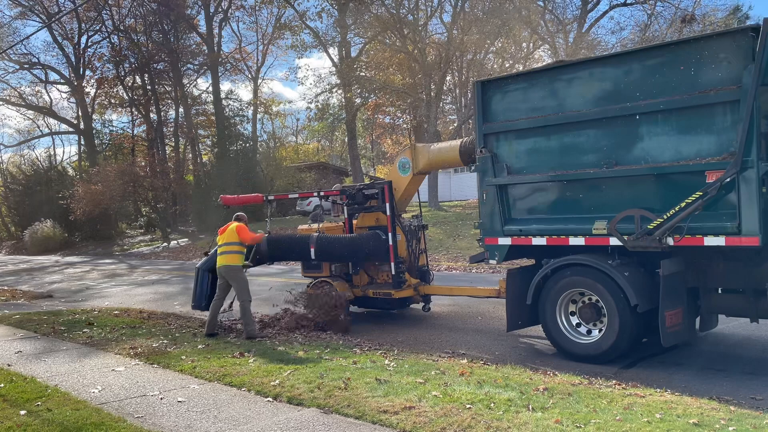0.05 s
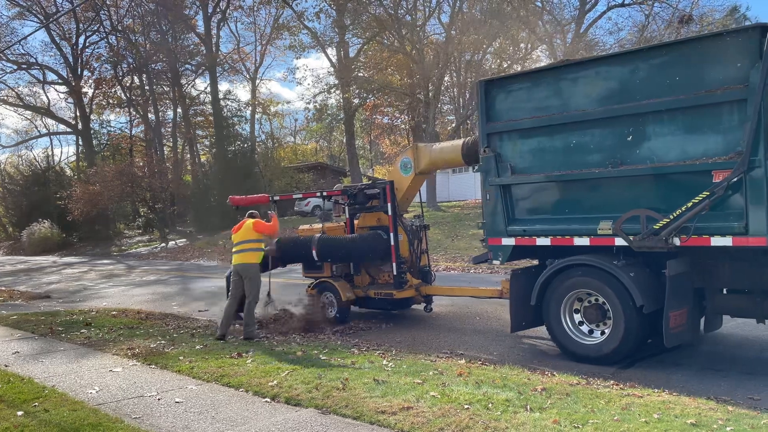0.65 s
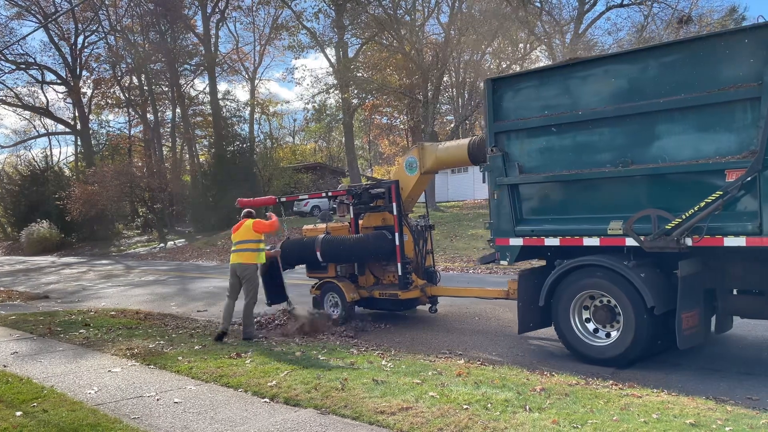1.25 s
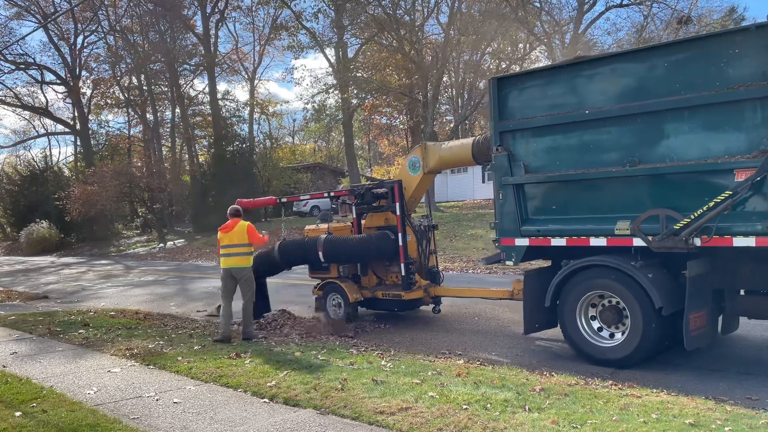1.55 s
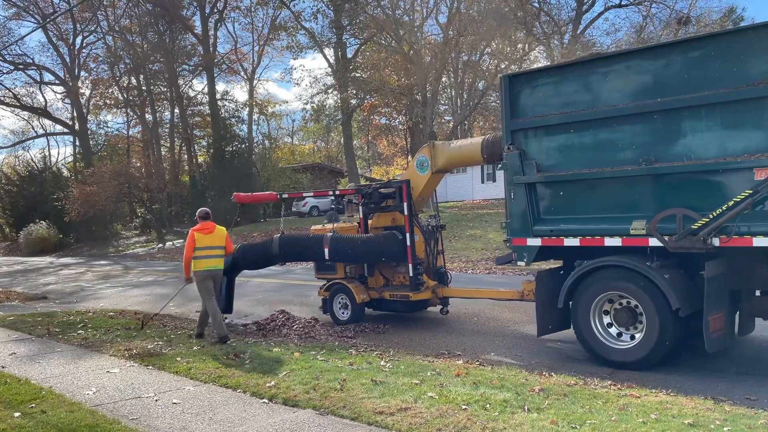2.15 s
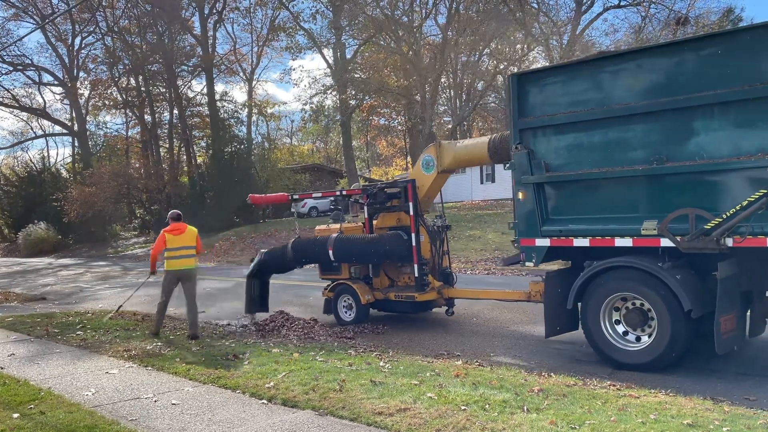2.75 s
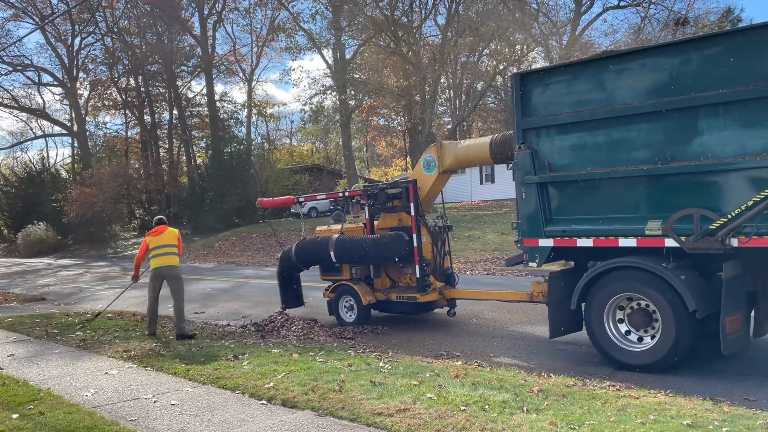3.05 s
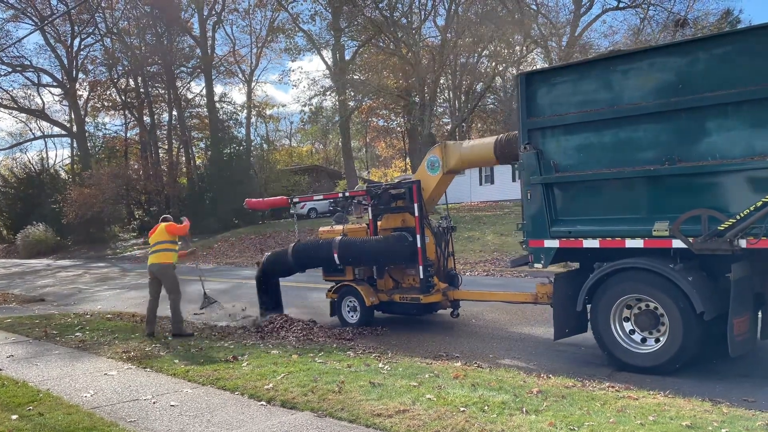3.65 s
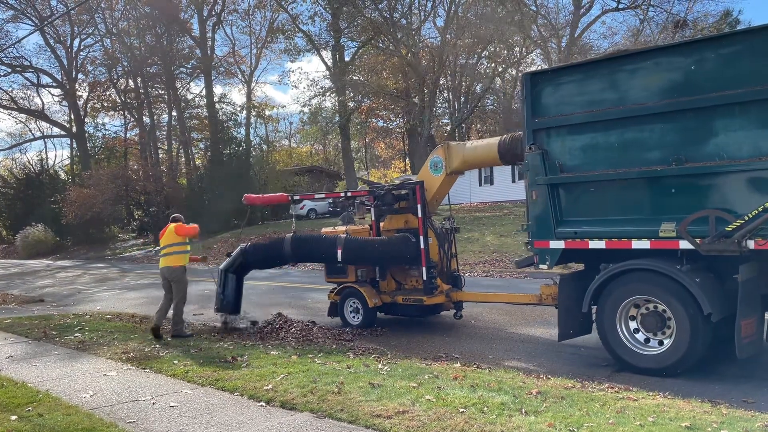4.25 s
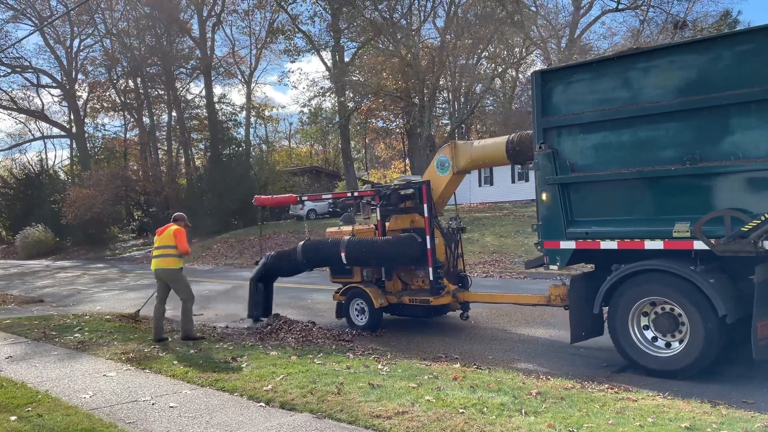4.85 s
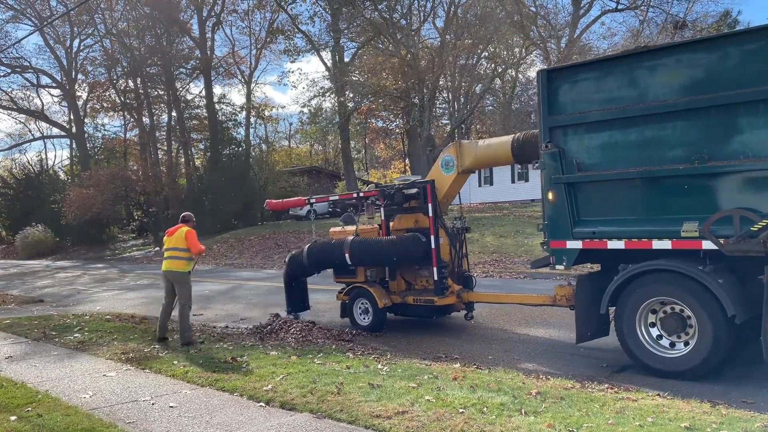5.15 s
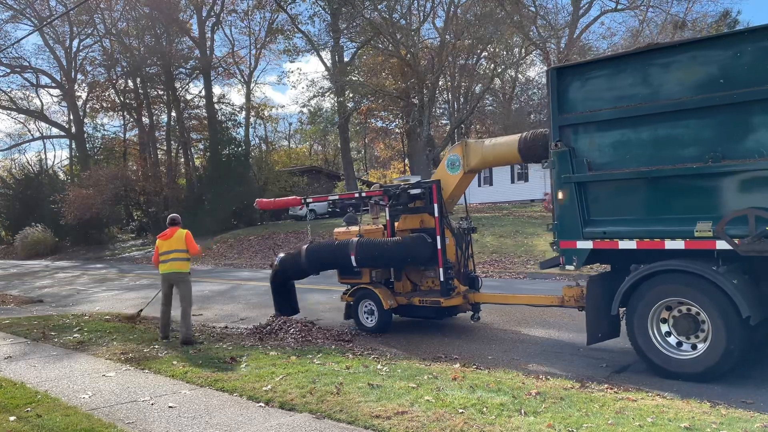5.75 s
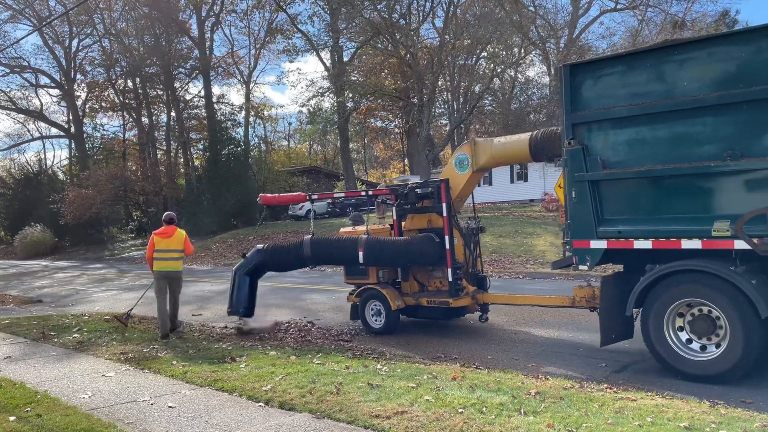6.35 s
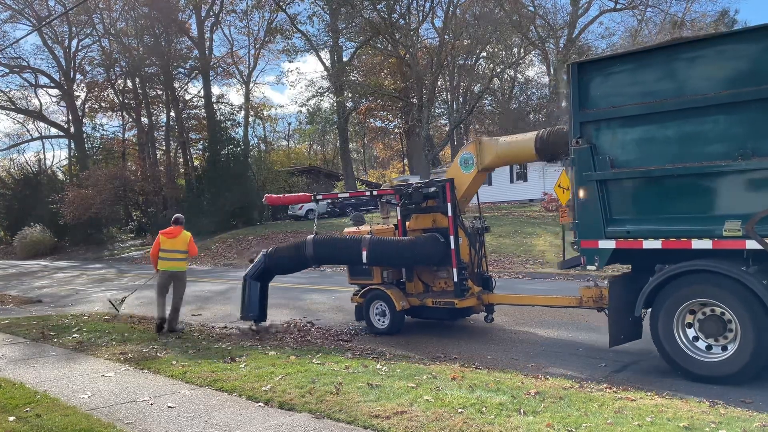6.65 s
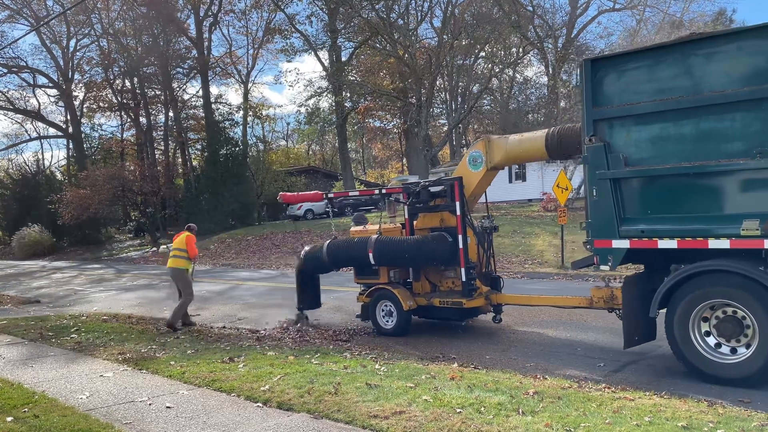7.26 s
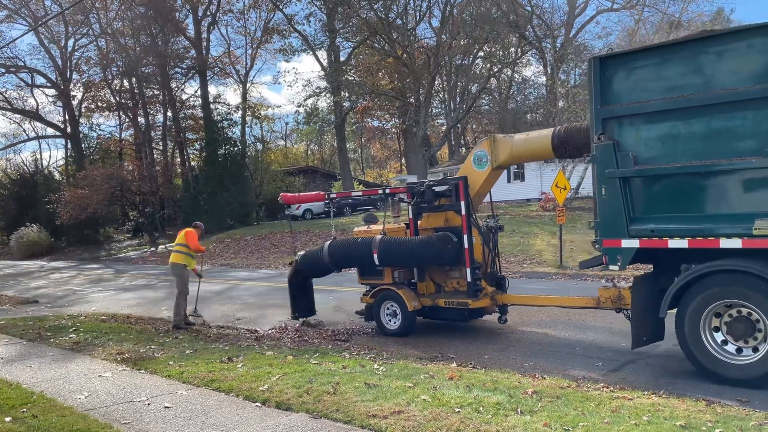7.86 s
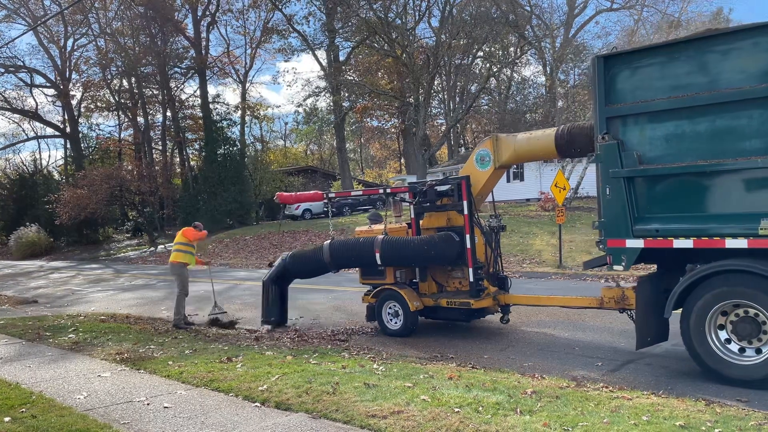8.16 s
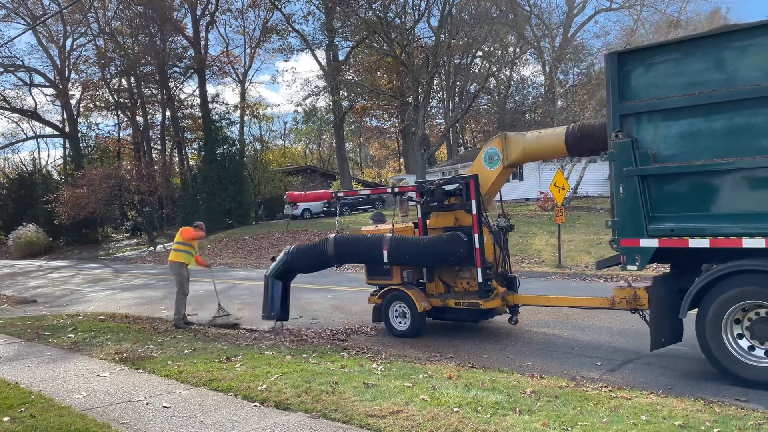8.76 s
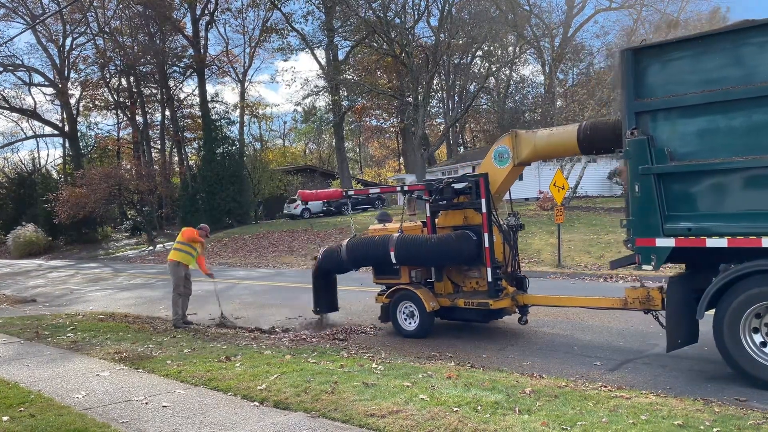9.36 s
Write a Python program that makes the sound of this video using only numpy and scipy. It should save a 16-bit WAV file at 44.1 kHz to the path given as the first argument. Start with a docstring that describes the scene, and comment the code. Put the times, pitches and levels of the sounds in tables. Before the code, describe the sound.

Outdoors by a kerb, a leaf vacuum a few metres away makes a continuous low drone, hum and suction roar. Surges of leaves hiss through it, with scattered twig knocks at first and hollow booms from the hose. Later a burst of loud knocks drags the engine and fan a little lower, and a hoarse whistle rises. High, thin squeals from a slow truck's brakes come and go throughout.

```python
"""A towed leaf vacuum works along a kerb, a few metres away, behind a slowly creeping truck.
From the start its engine drones, its belt-driven impeller hums and air roars in the hose, while leaves
hiss and rattle up the steel chute and dragging brakes squeal on and off. Wads and twigs knock on the
housing in the first 2.5 s; near 4 s the hose booms hollowly. Just after 6 s the heaviest wad goes
through: engine and impeller sag, sag again near 7.5 s, and the hose mouth whistles hoarsely."""
import sys
import numpy as np
from scipy import signal
from scipy.fft import rfft, irfft
from scipy.io import wavfile
from scipy.ndimage import uniform_filter1d, minimum_filter1d

SR = 44100
rng = np.random.default_rng(int(sys.argv[2]) if len(sys.argv) > 2 else 0)


def materialize(psi):
    """Save the field psi as 16-bit PCM at rate SR to the path in sys.argv[1].

    A 1-D psi becomes a single channel; in a 2-D psi each row is a channel.
    """
    bounded = np.clip(np.atleast_2d(psi).T, -1, 1)
    quanta = np.round(bounded * 32767).astype(np.int16)
    wavfile.write(sys.argv[1], SR, quanta)


N = 419391
T = np.arange(N) / SR
HZ = np.fft.rfftfreq(N, 1 / SR)

# The impeller's speed and hum. Each row: time in seconds, blade-passing frequency in Hz, level in dB.
IMPELLER_RUN = [(0.0, 233.2, -18.4), (0.47, 231.5, -12.3), (0.65, 234.6, -16.3), (1.6, 233.6, -15.5),
                (1.8, 236.0, -20.4), (2.05, 234.7, -15.9), (2.2, 233.0, -18.1), (2.6, 233.4, -13.6),
                (3.95, 235.7, -13.8), (4.35, 234.4, -16.3), (4.6, 233.6, -15.6), (5.15, 235.0, -13.1),
                (5.85, 234.3, -13.3), (6.15, 236.2, -17.7), (6.4, 228.4, -16.9), (6.98, 229.6, -17),
                (7.11, 231.6, -25), (7.22, 230, -19.5), (7.4, 226.5, -21), (7.55, 224.3, -18.2),
                (8.25, 229.2, -17), (8.65, 225.8, -18.2), (9.5, 229.9, -16.8)]
# Wads and twigs that hit the impeller. Each row: start in seconds, spray level in dB,
# time for the spray to fall 60 dB in seconds, hardness from 0 to 1, knock level in dB.
WAD_STRIKES = [(.033, -19.5, 0.18, 0, -23), (0.074, -24, .06, .1, -21), (.826, -25, .08, .8, -30),
               (1.060, -21, .09, 0.2, -20), (1.089, -20, .05, .7, -25), (1.108, -25, .06, .8, -26),
               (1.138, -21, .05, .8, -28), (1.157, -23, .05, 0.5, -24), (1.995, -20, .17, 0.8, -27),
               (2.055, -19, 0.063, 0.5, -20), (2.130, -20, .15, 0.6, -26), (2.149, -24, .07, .6, -25),
               (2.240, -18, .11, .5, -23), (2.455, -29, .06, .4, -23), (6.110, -29, .04, .2, -25),
               (6.145, -19, .1, .25, -10), (6.172, -20, 0.046, .95, -28), (6.218, -20, .07, .1, -17),
               (6.240, -21, .07, .1, -17), (6.281, -12.5, .1, .25, -6), (6.297, -16, 0.071, 0, -13),
               (6.331, -22, .12, 0, -20), (6.370, -20, 0.2, .1, -13), (6.399, -27, .14, 0, -13.5),
               (6.428, -30, .25, 0, -19), (7.398, -21, .14, 0.3, -21), (7.423, -26, .09, .5, -17),
               (7.479, -19, .1, .2, -19), (7.532, -23, 0.18, .2, -22), (7.612, -19, .059, .1, -20),
               (8.509, -25, .05, .5, -24)]


def engine():
    """Periodic firing radiates a harmonic exhaust note and amplitude-modulates a low mechanical roar."""
    # Each row: time in seconds, firing frequency in Hz, level in dB.
    engine_run = [(0.0, 80.9, -15.0), (0.45, 82.5, -14.1), (0.85, 80.3, -14.3), (1.05, 81.8, -14.2),
                  (1.2, 80.1, -14.8), (1.65, 80.7, -14.3), (2.55, 79.9, -14.8), (3.9, 80.7, -13.6),
                  (5.95, 80.0, -14.4), (6.3, 81.7, -13.5), (6.65, 78.0, -15.7), (7.35, 80.1, -14.7),
                  (7.6, 77.4, -15.3), (9.5, 78.6, -15.2)]
    # Each row: multiple of the firing rate, relative level in dB. Unequal cylinders give half orders.
    orders = [(1, 0), (1.5, -27), (3, -17), (3.5, -40), (5.5, -37), (6, -29.5), (6.5, -43), (7, -30.5)]
    # Brief dips of the note. Each row: start in seconds, length in seconds, level change in dB.
    dips = [(.07, 0.093, -1.5), (1.08, 0.098, -7), (1.184, 0.06, -3), (1.37, 0.11, -5), (2.09, 0.066, -7),
            (7.144, 0.088, -5), (8.45, .09, -4)]
    # Overtones that vary on their own. Each row: multiple of the firing rate, resting level in dB.
    overtones = [(2, -28.5), (5, -37.5)]
    # Their swells. Each row: start in seconds, length in seconds, multiple, level in dB.
    swells = [(.15, .7, 5, -31), (.4, .7, 2, -24), (1.1, 2.3, 2, -23), (4.3, 1, 2, -28), (5.1, 1.1, 5, -34),
              (7.5, .8, 2, -22.5), (8.5, 1.2, 2, -25.5)]
    # The roar's spectrum. Each row: frequency in Hz, relative level in dB.
    roar_spectrum = [(50, -27), (95, 0.5), (125, 0.5), (160, -1), (200, 3), (260, -1.5), (355, -4),
                     (425, -15.5), (475, -9), (560, -21.5), (1200, -66)]
    firing_hz, db = curves(engine_run)
    cycles = np.cumsum(firing_hz) / SR
    dips_db = sum(change_db * arch(start, length, peak=0.71) for start, length, change_db in dips)
    exhaust = amp(db + dips_db) * drone(cycles, orders, flutter=0.061, flutter_hz=22, sway_rad=0.029)
    for multiple, rest_db in overtones:
        level = overtone_envelope(multiple, rest_db, swells, waver_db=0.5, waver_hz=0.41)
        exhaust += level * drone(cycles, [(multiple, 0)], flutter=0.25, flutter_hz=12, sway_rad=0.04)
    throb = 1 + 0.19 * np.cos(2 * np.pi * cycles)
    roar = amp(-20.5) * stereo_noise(turbulence() * throb, roar_spectrum)
    return roar + exhaust * pan(left_db=-0.5)


def impeller():
    """Blades chop the air into a blade-passing tone; uneven inflow modulates it and its overtones."""
    # Harmonics that follow the hum's level. Each row: multiple of the blade rate, relative level in dB.
    orders = [(1, 0), (5, -33)]
    # Overtones that vary on their own. Each row: multiple of the blade rate, resting level in dB.
    overtones = [(2, -44.5), (3, -48.5), (4, -50.5), (5, -46.5)]
    # Their swells. Each row: start in seconds, length in seconds, multiple, level in dB.
    swells = [(0, .14, 2, -30), (.15, 1.3, 4, -40.5), (1.85, .35, 4, -37), (2.25, .37, 2, -34),
              (3.55, 1.5, 3, -36), (3.85, .7, 2, -32), (5.15, .5, 3, -38), (5.83, .42, 3, -32.5),
              (6.62, .6, 2, -33.5), (7.6, 1.2, 2, -33), (8.58, .4, 3, -35), (8.6, 1.1, 2, -34)]
    blade_hz, db = curves(IMPELLER_RUN)
    cycles = np.cumsum(blade_hz) / SR
    hum = amp(db) * drone(cycles, orders, flutter=0.046, flutter_hz=20, sway_rad=0.061)
    for multiple, rest_db in overtones:
        level = overtone_envelope(multiple, rest_db, swells, waver_db=2.5, waver_hz=2.3)
        hum += level * drone(cycles, [(multiple, 0)], flutter=0.5, flutter_hz=17, sway_rad=0.25)
    return hum * pan(left_db=0.8)


def sag_hz(full_speed_hz=234):
    """Load slows the impeller: the drop of its blade-passing frequency below full speed."""
    blade_hz, _ = curves(IMPELLER_RUN)
    return np.maximum(full_speed_hz - blade_hz, 0)


def suction(full_speed_db=-25.5, loss_db_per_hz=0.15):
    """Turbulent flow makes a broadband roar that weakens as the impeller slows, over low buffeting."""
    # Spectra of the roar and the buffeting. Each row: frequency in Hz, relative level in dB.
    air_spectrum = [(150, -4), (450, -3), (620, 3), (740, 6), (1000, -1.5), (1200, 0.5), (1650, -2.5),
                    (1780, -3), (1860, -4), (2030, -8), (2320, -3), (2650, -9.5), (2820, -7), (3000, -8),
                    (3400, -7.5), (4350, -12.5), (5000, -14), (7000, -24.5), (16000, -37)]
    buffet_spectrum = [(10, -40), (28, -27), (55, 2), (85, -1), (120, -5), (220, -7.5), (600, -57)]
    # Stronger puffs of buffeting. Each row: start in seconds, length in seconds, level in dB.
    puffs = [(0, 0.31, -19), (.74, 0.46, -24), (1.25, 0.24, -16), (2.055, 0.23, -16), (5.552, 0.32, -25),
             (7.1, 0.26, -23), (8.05, 0.43, -29)]
    air_level = amp(full_speed_db - loss_db_per_hz * sag_hz() + 0.5 * wander(25))
    air = air_level * stereo_noise(turbulence(), air_spectrum)
    puff_level = sum(amp(db) * arch(start, length, peak=0.25) for start, length, db in puffs)
    buffet_level = np.hypot(amp(-26 - 0.3 * wander(2.5)), puff_level)
    return air + buffet_level * stereo_noise(turbulence(), buffet_spectrum)


def intake(attack_s=0.017, release_s=0.073, loss_db_per_hz=0.5):
    """Incoherent sources add in power: a trickle plus gulps gives the leaf and debris amplitudes."""
    # Gulps up the hose. Each row: start in seconds, length in seconds, leaf hiss in dB, debris in dB.
    gulps = [(0.0, 0.055, -32.5, -24), (0.262, 0.13, -35.5, -36), (.45, 0.22, -43, -40),
             (0.79, 0.39, -35, -34), (1.793, 0.46, -34.5, -34), (2.33, 0.12, -35.5, -25.5),
             (2.5, 0.21, -40, -42), (2.6, 0.57, -60, -35), (3.9, 0.75, -36, -32.5), (4.15, 0.25, -38, -30),
             (4.774, 0.63, -36.5, -33.5), (5.47, 0.1, -31, -33), (5.94, 0.55, -34.5, -25),
             (6.066, 0.24, -29.5, -35), (6.45, 0.43, -37.5, -49), (6.87, 0.75, -34, -26.5),
             (7.938, 0.23, -35, -33), (8.163, 0.5, -30.5, -26.5), (8.65, 0.77, -38, -33),
             (9.2, 0.36, -33.5, -29.5)]
    leaf_power = np.full(N, amp(-40) ** 2)
    debris_power = amp(-33.5 - loss_db_per_hz * sag_hz()) ** 2
    for start, length, hiss_db, debris_db in gulps:
        age = np.maximum(T - start, 0)
        # Light leaves rush in at once and trail off; heavy debris lifts later.
        rush = (1 - np.exp(-age / attack_s)) * np.exp(-np.maximum(age - length, 0) / release_s)
        leaf_power += (amp(hiss_db) * rush) ** 2
        debris_power += (amp(debris_db) * arch(start, length, peak=0.82)) ** 2
    return np.sqrt(leaf_power), np.sqrt(debris_power)


def leaves(level):
    """Thousands of dry shreds a second scour the hose and chute; their impacts merge into a hiss."""
    # Each row: frequency in Hz, relative level in dB.
    hiss_spectrum = [(600, -36), (2500, 4), (4000, -0.5), (5200, 3.5), (6500, 7.5), (7600, -0.5), (9200, 0),
                     (10500, -3.5), (13200, -4.5), (15600, -4)]
    shreds = unit(turbulence() + 0.7 * impacts(per_s=2800, spread_db=3.5))
    flurries = amp(1.13 * wander(32) + 0.34 * wander(14))
    return level * flurries * stereo_noise(shreds, hiss_spectrum)


def debris(level):
    """Heavy scraps strike the steel chute at random, a shot noise heard as a rattle."""
    # Each row: frequency in Hz, relative level in dB.
    rattle_spectrum = [(150, -13), (350, 4.5), (600, -3.5), (1150, 1), (1900, -2.5), (3300, -4),
                       (5000, -9.5), (8000, -13), (15000, -48)]
    flurries = amp(1.5 * wander(40))
    return level * flurries * stereo_noise(impacts(per_s=3500, spread_db=3.0), rattle_spectrum)


def wad_bursts(rise_s=0.0015):
    """Wads burst on the blades and spray the housing; harder impacts put more energy in the treble."""
    # Spectra of a soft wad on steel and a snapping twig. Each row: frequency in Hz, relative level in dB.
    wad_spectrum = [(200, -16), (400, -6), (600, -6), (1100, 1), (1900, -5), (3300, -8), (5000, -16),
                    (8000, -27), (15000, -52)]
    twig_spectrum = [(500, -15), (1500, -1), (2400, 0), (3500, -1), (5000, -7), (7000, -10), (10000, -22),
                     (15000, -40)]
    thud, crack = np.zeros((2, N))
    for start, db, t60, hardness, _ in WAD_STRIKES:
        age = np.maximum(T - start, 0)
        burst = amp(db - 60 * age / t60) * (1 - np.exp(-age / rise_s))
        thud += np.sqrt(1 - hardness) * burst
        crack += np.sqrt(hardness) * burst
    clods = impacts(per_s=12000, spread_db=1.2)
    splinters = impacts(per_s=6000, spread_db=2)
    return thud * stereo_noise(clods, wad_spectrum) + crack * stereo_noise(splinters, twig_spectrum)


def housing_knocks(landing_db=5, detune_share=0.0056, rise_s=0.003):
    """Each wad excites the steel housing's damped modes; where it lands decides how much each rings."""
    # Each row: mode frequency in Hz, relative level in dB, time to fall 60 dB in seconds.
    housing_modes = [(848, -8, 0.1), (1029, -2.5, 0.076), (1133, 0, 0.054), (1334, 3, 0.037),
                     (1500, -1, 0.032), (1870, -10, 0.12), (2670, -18, 0.071), (3640, -18, 0.13)]
    hz, mode_db, t60 = np.transpose(housing_modes)[:, :, None]
    age = np.arange(round(0.3 * SR)) / SR
    onset = 1 - np.exp(-age / rise_s)
    out = np.zeros(N)
    for start, *_, knock_db in WAD_STRIKES:
        landing, detune = rng.standard_normal((2, len(hz), 1))
        decay = amp(mode_db + landing_db * landing - 60 * age / t60)
        modes = decay * np.sin(2 * np.pi * hz * (1 + detune_share * detune) * age)
        ring = modes[::2].sum(0) - modes[1::2].sum(0)  # neighbouring modes have opposite signs
        ring /= np.linalg.norm(amp(mode_db))
        out[round(start * SR):][:len(age)] += amp(knock_db) * ring * onset
    return out * pan(left_db=2.0)


def hose_booms():
    """The swinging hose mouth comes close to the road, and its air column resonates hollowly."""
    # Each row: start in seconds, length in seconds, resonance in Hz, width in Hz, level in dB.
    booms = [(-.06, 0.26, 352, 170, -27.5), (0, 0.89, 777, 90, -37), (1.9, 0.34, 776, 120, -31.5),
             (2.2, 1.1, 130, 50, -28), (3.48, 0.38, 340, 150, -27), (3.967, .6, 422, 200, -29.5),
             (4.0, 1.3, 127, 50, -25), (4.15, .55, 785, 90, -35), (4.98, 0.56, 320, 140, -28.5),
             (6.147, 0.43, 355, 160, -26.5), (8.95, 0.32, 332, 140, -28.5)]
    out = np.zeros(N)
    for start, length, hz, width_hz, db in booms:
        column = irfft(rfft(rng.standard_normal(N)) * resonance(hz, width_hz), N)
        out += amp(db) * arch(start, length, peak=0.38) * unit(column)
    return out * pan(left_db=4.5)


def hose_whistle(full_speed_db=-48.5, gain_db_per_hz=1.21):
    """Inrushing air excites narrow resonances of the hose mouth, louder when the impeller runs slow."""
    # Each row: resonance in Hz, width in Hz, relative level in dB.
    mouth_modes = [(2310, 190, 4), (4040, 110, -1)]
    response = sum(amp(db) * resonance(hz, width_hz) for hz, width_hz, db in mouth_modes)
    whistle = irfft(rfft(turbulence()) * response, N)
    level = amp(full_speed_db + gain_db_per_hz * sag_hz())
    return level * stereo_noise(whistle, spectrum=[(1000, 0)])  # flat: no further colouring


def brakes(fade_s=0.04):
    """Friction of dragging linings excites high modes, which bend in pitch as the wheels turn."""
    # Each row: start in seconds, length in seconds, pitch in Hz, glide in Hz, glide exponent
    # (1 is even, more is later), level in dB, phase lag of the right channel in radians.
    squeals = [(0, .46, 8000, -100, 7, -37.5, 2.8), (0, .38, 8148, -40, 7, -46, 2.3),
               (2.05, .23, 7750, -10, 1, -37, 2.4), (2.58, 1.22, 7948, -30, 1.5, -48, 2.5),
               (4.5, .48, 7612, 20, 1, -37.5, 2.5), (4.94, .18, 7640, 80, 1, -44, 2.6),
               (5.14, .4, 7965, 10, 1, -45.5, 2.8), (6.31, .34, 7625, 115, 4, -38, 2.45),
               (6.61, .24, 7735, 50, 1, -39.5, 2.3), (6.82, .32, 7285, 15, 1, -38, 1.7),
               (7.09, .32, 7300, 30, 1, -40.5, 2.6), (6.9, .48, 8105, -55, 1, -38, 2.7),
               (7.47, .29, 7815, -10, 1, -44, 2.7), (7.83, .27, 7780, -125, 1, -42, 2.5),
               (8.74, .2, 7580, 75, 1, -47, 2.8), (8.76, .28, 8075, 55, 1, -48, 3),
               (9.02, .3, 7892, 30, 1, -45.5, 2.8)]
    out = np.zeros((2, N))
    grip = unit(amp(3.5 * wander(20)))
    jitter_hz = 4 * wander(30)
    for start, length, pitch_hz, glide_hz, exponent, db, lag in squeals:
        on = (T >= start) & (T < start + length)
        age = T[on] - start
        hz = pitch_hz + glide_hz * (age / length) ** exponent + jitter_hz[on]
        phase = 2 * np.pi * np.cumsum(hz) / SR - np.array([[0], [lag]])
        fade = np.clip(np.minimum(age, length - age) / fade_s, 0, 1)
        out[:, on] += np.sqrt(2) * amp(db) * grip[on] * fade * np.sin(phase)
    return out


def drone(cycles, orders, flutter, flutter_hz, sway_rad):
    """Partials of a rotation, randomly modulated in amplitude and, in proportion to order, in phase."""
    out = np.zeros(N)
    for multiple, db in orders:
        phase = 2 * np.pi * (multiple * cycles + rng.random())
        phase += sway_rad * multiple * wander(1.36)
        out += amp(db) * np.cos(phase) * (1 + flutter * wander(flutter_hz))
    return np.sqrt(2) * out


def overtone_envelope(multiple, rest_db, swells, waver_db, waver_hz):
    """Amplitude of one harmonic: a wavering resting level and its swells add in power."""
    rise = sum(amp(db) * arch(start, length, peak=0.54)
               for start, length, order, db in swells if order == multiple)
    return np.hypot(amp(rest_db + waver_db * wander(waver_hz)), rise)


def stereo_noise(pair, spectrum):
    """Direct and scattered sound, coloured alike, mix into two partly coherent channels of rms 1."""
    # Each row: frequency in Hz, coherence of the channels from 0 to 1.
    coherence_curve = [(100, 0.97), (350, 0.93), (560, 0.82), (700, 0.16), (850, 0.99), (1800, 0.84),
                       (4000, 0.98), (5000, 0.49), (5400, 0.54), (6300, 0.94), (7200, 1), (8200, 1),
                       (9600, 1), (11000, 1)]
    # Each row: frequency in Hz, left minus right level in dB.
    balance_curve = [(45, 6), (80, 7.5), (240, 1.5), (480, 0), (700, 10), (950, 5), (2000, 3.5), (2650, 5),
                     (3700, 1), (5000, 0), (6000, 0), (9000, -0.5)]
    # Each row: frequency in Hz, phase lead of the left channel in radians.
    lead_curve = [(300, 0), (620, .7), (800, -.45), (1900, -.4), (2400, .2), (5400, .2), (5800, -.3),
                  (6800, -.3), (7700, -2.8), (8800, -3.2), (10500, -6.2), (12300, -6.4), (13600, -9.4)]
    direct, scattered = rfft(pair) * amp(across(spectrum))
    coherence = np.clip(across(coherence_curve), 0, 1)
    right = coherence * direct + np.sqrt(1 - coherence ** 2) * scattered
    right *= np.exp(-1j * across(lead_curve))
    side = amp(across(balance_curve) / 2)
    channels = np.array([direct * side, right / side]) / np.hypot(side, 1 / side)
    return unit(irfft(channels, N))


def turbulence():
    """Two uncorrelated white noises."""
    return rng.standard_normal((2, N))


def impacts(per_s, spread_db):
    """Shot noise: two trains of tiny random strikes, a few much harder than the rest."""
    size = amp(spread_db * np.minimum(rng.exponential(1, (2, N)), 4))
    sign = rng.choice([-1, 1], (2, N))
    struck = rng.random((2, N)) < per_s / SR
    return unit(size * sign * struck)


def resonance(hz, width_hz):
    """Frequency response of two equal resonators in cascade."""
    return 1 / (1 + 2j * (HZ - hz) / width_hz) ** 2


def wander(rate_hz):
    """Low-pass noise of rms 1: a smooth random drift about as fast as the rate."""
    return unit(irfft(rfft(rng.standard_normal(N)) / (1 + (HZ / rate_hz) ** 4), N))


def arch(start, length, peak):
    """A smooth envelope from 0 to 1 and back, highest at the fraction peak of its length."""
    progress = (T - start) / length
    return np.sin(np.pi / 2 * np.interp(progress, [0, peak, 1], [0, 1, 0]))


def curves(rows):
    """The columns of a timed table, interpolated to every sample."""
    times, *columns = np.transpose(rows)
    return [np.interp(T, times, column) for column in columns]


def across(points):
    """A table interpolated over log frequency to every bin."""
    hz, value = np.transpose(points)
    return np.interp(np.log(HZ + 1), np.log(hz + 1), value)


def pan(left_db):
    """Channel gains for a level difference in favour of the left."""
    return amp(np.array([[left_db], [-left_db]]) / 2)


def amp(db):
    """Decibels to amplitude ratio."""
    return 10 ** (np.asarray(db) / 20)


def unit(x):
    """Scales to rms 1."""
    return x / np.sqrt(np.mean(x ** 2) + 1e-20)


def scene():
    """Superposition of the machine, its load and the truck."""
    leaf_level, debris_level = intake()
    machine = engine() + impeller() + suction() + hose_whistle()
    load = leaves(leaf_level) + debris(debris_level) + wad_bursts()
    return machine + load + brakes() + housing_knocks() + hose_booms()


def record(dry):
    """A quick limiter holds the peaks under full scale; a low-pass filter then limits the band."""
    ceiling, window_samples, cutoff_hz = 0.93, 111, 14000
    allowed_gain = np.minimum(1, ceiling / (abs(dry).max(0) + 1e-9))
    gain = uniform_filter1d(minimum_filter1d(allowed_gain, window_samples), window_samples)
    low_pass = signal.firwin(511, cutoff_hz, window=("kaiser", 9), fs=SR)
    return signal.oaconvolve(dry * gain, low_pass[None], "same")


dry = scene()
out = record(dry)
materialize(out)
```